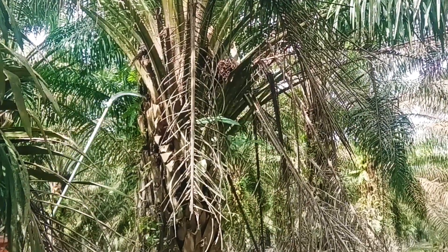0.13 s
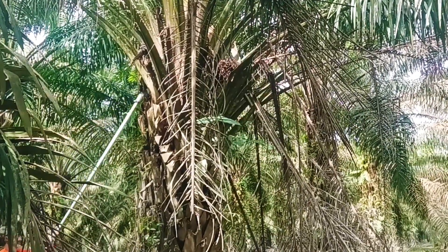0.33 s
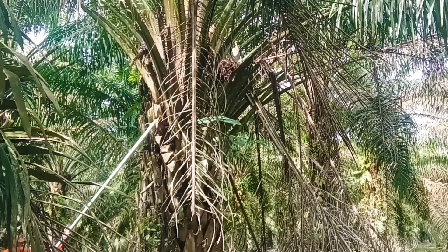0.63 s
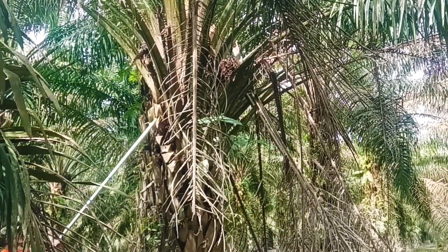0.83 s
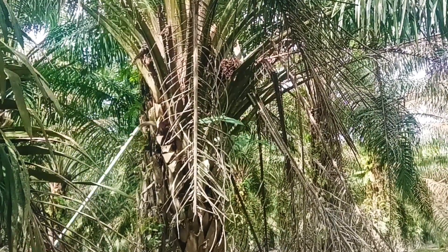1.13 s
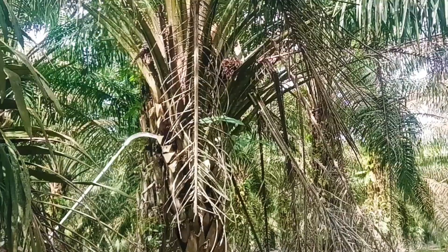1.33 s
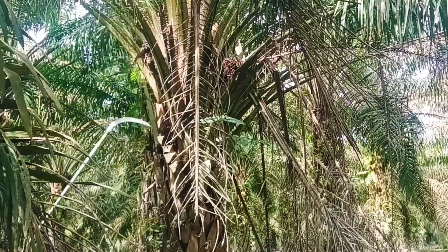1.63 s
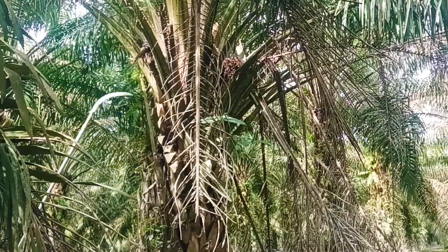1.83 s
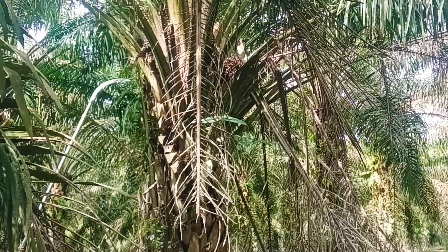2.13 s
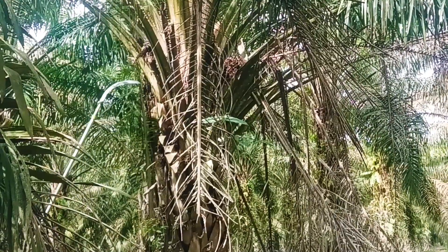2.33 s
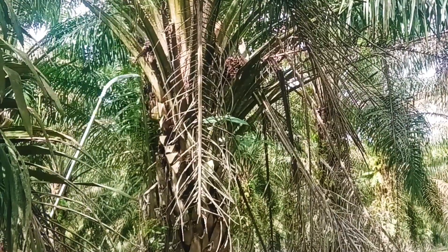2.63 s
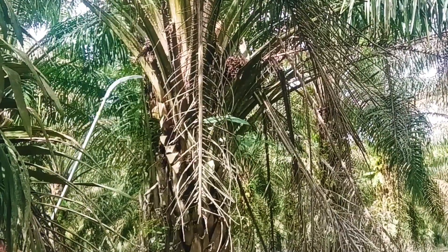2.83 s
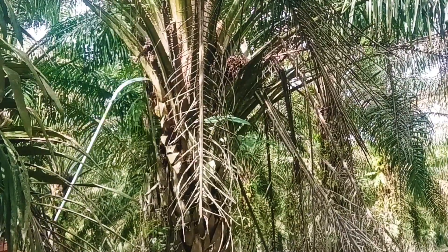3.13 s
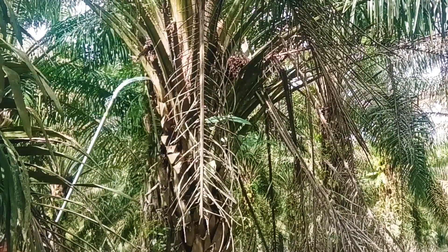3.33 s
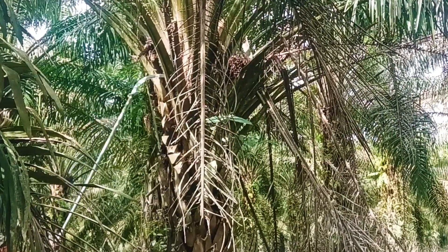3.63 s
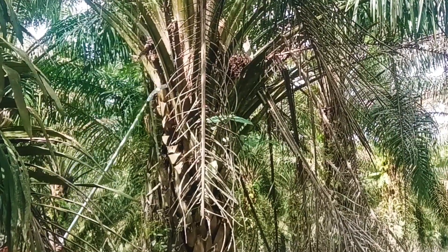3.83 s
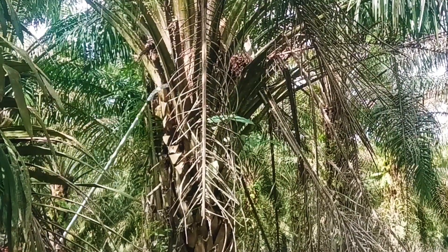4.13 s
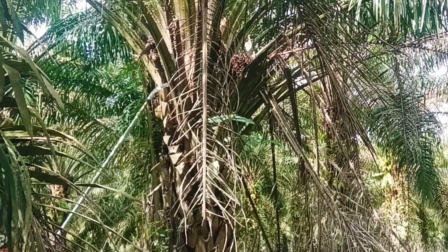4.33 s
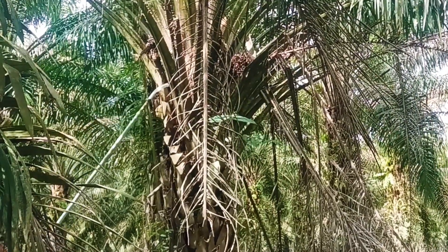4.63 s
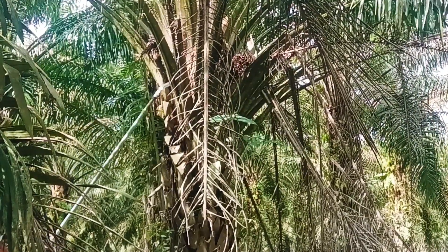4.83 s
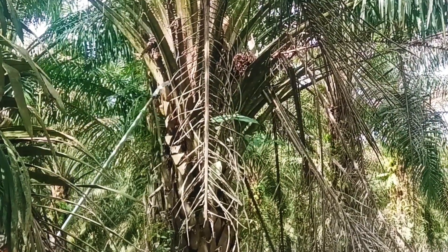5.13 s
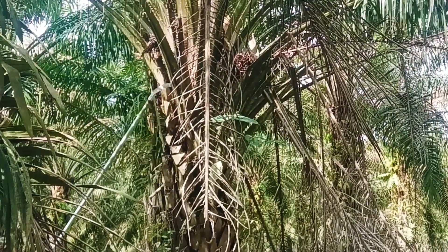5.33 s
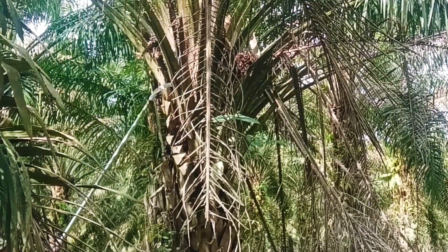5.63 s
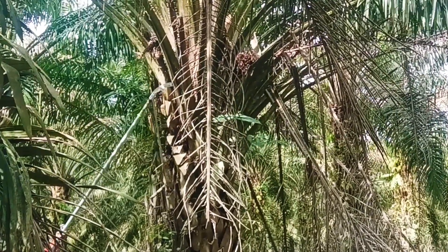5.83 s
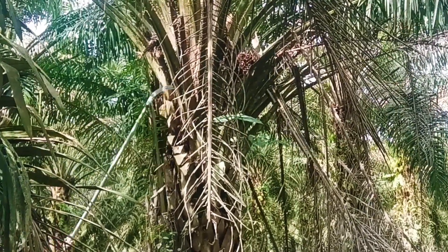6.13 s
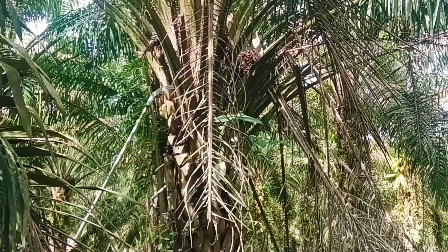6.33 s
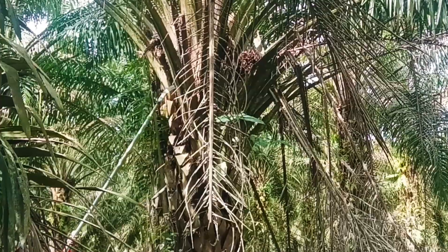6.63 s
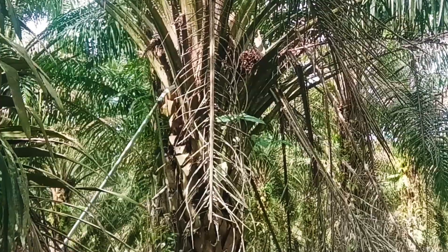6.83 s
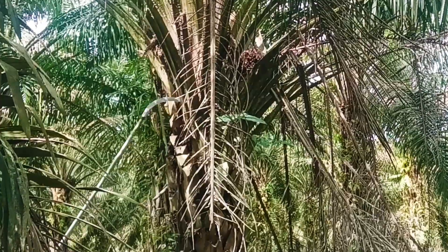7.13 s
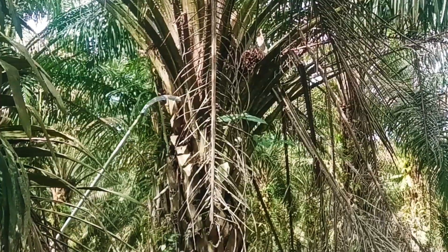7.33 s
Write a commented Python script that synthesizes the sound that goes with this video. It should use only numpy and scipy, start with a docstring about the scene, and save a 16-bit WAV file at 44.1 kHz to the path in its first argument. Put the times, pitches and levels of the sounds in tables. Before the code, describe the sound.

A pole sickle knocks against palm stalks and tears through them with cracks and leafy rustling, over a steady high insect buzz.

```python
"""Insects buzz high and steady in a grove while, a few metres off, a sickle on a pole cuts oil palm fronds.
The blade knocks against the stalks, then is pulled through them: fibres tear and snap, the steel
judders and squeaks, the stalk groans, cracks and thumps. Leaflets rustle as a frond slides down.
Heard on a close pair of microphones, with a faint scatter from the palms and a distant rumble."""
import sys
import numpy as np
from scipy import signal
from scipy.fft import rfft, irfft, next_fast_len
from scipy.io import wavfile
from scipy.ndimage import uniform_filter1d

SR = 44100
rng = np.random.default_rng(int(sys.argv[2]) if len(sys.argv) > 2 else 0)


def unload_wav(signal):
    """Save mono or channel-first audio to the path in sys.argv[1] as 16-bit WAV at rate SR, clipped to [-1, 1]."""
    wavfile.write(
        sys.argv[1],
        SR,
        np.round(np.clip(np.atleast_2d(signal).T, -1, 1) * 32767).astype(np.int16),
    )


N = 329427
T = np.arange(N) / SR
FFT_SIZE = next_fast_len(N + SR)
HZ = np.fft.rfftfreq(FFT_SIZE, 1 / SR)

# pulls of the blade through a stalk:
# (start [s], build-up [s], hold [s], stalk groan [dB], juicy core tearing [dB], dry skin rasp [dB])
PULLS = [(0.24, .025, 0.037, -51, -64, -54), (0.555, 0.0081, 0.008, -39.5, -40.5, -51),
         (0.603, .02, 0.032, -50, -56, -58), (0.692, 0.0031, 0.0091, -40, -50, -42),
         (0.728, .015, 0.028, -52, -52, -61), (1.156, 0.046, 0.069, -32.5, -34, -34),
         (1.355, 0.015, 0.0097, -40, -40.5, -39.5), (1.468, 0.024, 0.041, -40, -45, -38.5),
         (3.911, .035, 0.019, -49, -42, -45), (4.6, 0.01, .03, -39.5, -37.5, -43.5),
         (4.698, 0.012, 0.014, -47, -38, -52), (4.756, .006, 0.02, -43.5, -41.5, -53),
         (4.784, .025, .02, -72, -71, -50), (5.358, 0.022, 0.046, -52, -54.5, -62),
         (5.42, 0.039, 0.019, -49.5, -42, -52), (6.057, .018, 0.018, -46, -39.5, -42),
         (6.211, .015, 0.037, -49.5, -56, -60), (6.274, 0.0029, 0.034, -48.5, -42.5, -44),
         (6.611, 0.019, 0.018, -44, -51.5, -55), (6.667, 0.013, 0.022, -48, -52.5, -56),
         (6.771, 0.024, .015, -50, -48, -57), (7.155, 0.031, 0.11, -31.5, -29.5, -34)]
# spectrum of the stalk's dry skin breaking: (frequency [Hz], level [dB])
SKIN_SPECTRUM = [(400, -32), (900, -10), (1600, -4), (2800, 4.5), (4000, -1.5), (5500, -5), (8000, -4.5),
                 (11000, -14.5), (13000, -20), (15500, -37)]
# how alike the two microphones hear the palm: (frequency [Hz], correlation [-1..1])
PALM_LIKENESS = [(100, 1), (600, 0.94), (1000, 0.72), (1600, 0.91), (2500, 0.57), (4000, 0.11),
                 (8000, 0.27), (15000, 0.079)]


def amp(db):
    """Decibels to amplitude."""
    return 10 ** (np.asarray(db) / 20)


def unit(x):
    """Scales to an RMS of one."""
    return x / np.sqrt(np.mean(x ** 2) + 1e-20)


def curve_at(points, hz):
    """Reads a curve along a logarithmic frequency axis."""
    f, value = np.transpose(points)
    return np.interp(np.log(hz + 1), np.log(f + 1), value)


def dying(t, t60):
    """A decay that loses 60 dB in t60 seconds."""
    return np.exp(-np.log(1000) * t / np.maximum(t60, 1e-3))


def add(mix, start_s, sound):
    """Mixes a sound in at its start time."""
    part = mix[..., max(round(start_s * SR), 0):][..., :sound.shape[-1]]
    part += sound[..., :part.shape[-1]]


def colour(x, spectrum, size=4096):
    """A causal filter of unit energy with the given spectral shape."""
    gain_db = np.maximum(curve_at(spectrum, abs(np.fft.fftfreq(size, 1 / SR))), -100)
    minimum_phase = np.exp(np.conj(signal.hilbert(np.log(amp(gain_db)))))
    taps = np.fft.ifft(minimum_phase).real[:size // 2]
    return signal.oaconvolve(x, taps[None] / np.linalg.norm(taps), axes=1)[:, :N]


def mic_pair(x, likeness):
    """Makes two unrelated channels as alike as two close microphones hear them."""
    a, b = rfft(x, FFT_SIZE)
    same = np.clip(curve_at(likeness, HZ), -1, 1)
    common, apart = np.sqrt((1 + same) / 2) * a, np.sqrt((1 - same) / 2) * b
    return irfft([common + apart, common - apart], FFT_SIZE)[:, :x.shape[1]]


def crackle(per_s, spread_db, grain_s, bed):
    """Tiny bursts of unequal size at random moments, over a bed of countless weaker ones."""
    sizes = amp(spread_db * np.minimum(rng.exponential(1, N), np.e))
    bursts = sizes * (rng.random(N) < per_s / SR)
    power = signal.lfilter([1], [1, -np.exp(-1 / (grain_s * SR))], bursts ** 2)
    return unit(np.sqrt(power / power.mean() + bed) * rng.standard_normal((2, N)))


def air():
    """Distant rumble and the soft hiss of the plantation."""
    # the ambience: (frequency [Hz], level [dB])
    spectrum = [(20, -32), (40, -43), (48, -8), (57, 6), (72, -0.5), (110, 2.5), (200, -3.5), (400, -8.5),
                (800, -12.5), (1400, -17.5), (2100, -18), (3200, -20.5), (5000, -25.5), (8000, -41),
                (12000, -38), (14400, -19), (15500, -31)]
    # its likeness at the two microphones: (frequency [Hz], correlation [-1..1])
    likeness = [(60, 0.81), (130, 0.73), (290, 0.5), (640, 0.3), (1410, -0.33), (3100, 0.25), (6820, -0.04),
                (15000, 0.087)]
    return amp(-54.5) * mic_pair(colour(rng.standard_normal((2, N)), spectrum), likeness)


def insects():
    """Many cicadas merge into one band of buzz that wavers slightly; the nearest adds a thin pitch."""
    # the band of the chorus: (frequency [Hz], level [dB])
    chorus_band = [(5600, -55.5), (6200, -16.5), (6700, -4.5), (7050, 0.5), (7200, 6), (7450, -0.5),
                   (7750, -5), (8100, -23), (9000, -28), (10000, -53)]
    nearest_band = [(7000, -50), (7160, -12), (7195, 0), (7230, -12), (7400, -50)]
    # the chorus eases off once, then holds: (time [s], level [dB])
    loudness = [(0, -42.5), (2, -43.5), (2.7, -46.2), (7.47, -46)]
    drift = uniform_filter1d(rng.standard_normal(N), size=4000)
    waver_db = 0.22 * unit(uniform_filter1d(drift, size=4000))
    chorus = colour(rng.standard_normal((2, N)), chorus_band)
    nearest = colour(rng.standard_normal((2, N)), nearest_band)
    return amp(np.interp(T, *np.transpose(loudness)) + waver_db) * (chorus + amp(-20.0) * nearest)


def leaf_motion():
    """How hard the leaflets move: a faint stir, sweeps that swell and settle, and the sliding frond."""
    # the cut frond slides down through its neighbours: (time [s], level [dB])
    slide = [(1.45, -49), (1.58, -43), (1.66, -42), (1.75, -45.5), (1.98, -42), (2.28, -47), (2.5, -59.5),
             (3.1, -66.5)]
    # the pole or a loose frond sweeps the leaflets: (peak time [s], level [dB], swell [s], t60 [s])
    sweeps = [(0.005, -43, 0.07, 0.21), (0.15, -45.5, 0.36, 0.72), (0.32, -53, 0.097, 0.84),
              (0.55, -50, 0.16, 0.98), (0.73, -47, 0.061, 0.73), (0.83, -49, 0.18, 0.42),
              (1.28, -36, 0.093, 0.71), (3.098, -56, 0.026, 1), (4.2, -62.5, 0.61, 0.83),
              (4.95, -61, 0.9, 12), (5.7, -68, 0.48, 11), (6.22, -59, 0.2, 0.55), (7.46, -38.5, 0.15, 1)]
    stir_db, swell_db = -70.5, 21.5
    sliding = amp(np.interp(T, *np.transpose(slide), left=-np.inf, right=-np.inf))
    power = amp(stir_db) ** 2 + sliding ** 2
    for peak_s, db, swell_s, t60 in sweeps:
        swelling = amp(-swell_db * np.maximum(peak_s - T, 0) / swell_s)
        settling = dying(np.maximum(T - peak_s, 0), t60)
        power += (amp(db) * swelling * settling) ** 2
    return np.sqrt(power)


def leaves():
    """Stiff leaflets brush against one another; now and then one flicks past with a tick."""
    # brushing leaflets: (frequency [Hz], level [dB])
    spectrum = [(100, -18), (250, -0.5), (600, -4.5), (1500, 0), (2900, 3), (4500, -1), (6000, -2.5),
                (8000, 0), (10000, -9), (11500, -7), (13000, -18), (15500, -16)]
    brushing = crackle(per_s=900, spread_db=3, grain_s=.0008, bed=1)
    flicks = amp(-7) * crackle(per_s=50, spread_db=3.5, grain_s=.0012, bed=0)
    return amp(3.5) * colour(leaf_motion() * (brushing + flicks), spectrum)


def squeaks():
    """Stick and slip of the blade: a short hoarse whistle whose pitch and strength both stumble."""
    # slips on wet fibre: (time [s], length [s], start pitch [Hz], end pitch [Hz], level [dB])
    slips = [(.795, 0.033, 2340, 2360, -38.5), (0.832, 0.019, 2046, 1794, -37),
             (0.837, 0.028, 1544, 1390, -44.5), (4.637, 0.016, 1176, 1026, -31),
             (4.722, 0.027, 840, 813, -36), (4.777, 0.023, 558, 486, -37.5), (6.61, 0.025, 2670, 2440, -52),
             (7.439, 0.039, 1614, 1570, -42)]
    out = np.zeros((2, N))
    for start, length, start_hz, end_hz, db in slips:
        n = int(length * SR)
        jitter, shimmer = unit(uniform_filter1d(rng.standard_normal((2, 2, n)), size=40))
        hz = np.linspace(start_hz, end_hz, n) * (1 + .033 * jitter)
        whistle = (1 + 0.13 * shimmer) * np.sin(2 * np.pi * np.cumsum(hz, 1) / SR)
        add(out, start, amp(db) * signal.windows.tukey(n, .7) * unit(whistle))
    return out


def blade_judder():
    """A gritty judder of the edge drives the modes of the steel, which the stalk damps quickly."""
    # modes of the blade, gripped by the stalk: (frequency [Hz], level [dB], t60 [s])
    steel_modes = [(2440, -5, 0.041), (2900, -7, 0.053), (3060, -1.5, 0.081), (3822, -16, 0.054),
                   (4220, -4, 0.053), (5050, 0.5, 0.065), (5760, 1, 0.05), (7960, 0.5, 0.011),
                   (10230, -8, .007), (10860, -4, 0.0091), (11340, -9, 0.0073), (12700, -21, .015)]
    # the edge catches: (time [s], level [dB], centre of the shaken modes [Hz], judder t60 [s])
    catches = [(.086, -41.5, 11500, 0.06), (.70, -46.5, 11300, 0.21), (1.235, -41, 10500, 0.29),
               (3.928, -49, 9550, .12), (4.62, -48, 10800, 0.087), (4.65, -46, 2500, 0.14),
               (4.715, -43, 2200, 0.16), (4.816, -46.5, 3520, 0.097), (5.3, -57, 6000, .09),
               (5.311, -49, 2500, 0.055), (6.07, -38, 3350, 0.16), (6.096, -47, 4400, .09),
               (6.277, -45.5, 11000, 0.19), (6.685, -49.5, 10900, 0.13), (7.21, -39.5, 11000, 0.4)]
    t, out = np.arange(SR // 5) / SR, np.zeros((2, N))
    hz, mode_db, t60 = np.transpose(steel_modes)[:, :, None]
    modes = dying(t, t60) * np.sin(2 * np.pi * hz * t)
    modes *= amp(mode_db) / np.linalg.norm(modes, axis=1, keepdims=True)
    for start, db, centre_hz, judder_t60 in catches:
        shaken = np.exp(-(np.log2(hz / centre_hz) / 0.64) ** 2)
        ring = (shaken * modes).sum(axis=0)
        judder = dying(t, judder_t60) * rng.standard_normal((2, len(t)))
        add(out, start, amp(db) * signal.fftconvolve(judder, ring[None], axes=1))
    return amp(3.5) * out


def snaps():
    """Single dry fibres break with a bright tick."""
    # breaking fibres: (time [s], level [dB], t60 [s])
    fibres = [(0.0837, -32, 0.027), (0.122, -24, 0.02), (0.15, -30, 0.025), (0.175, -37, 0.036),
              (0.357, -39, 0.035), (0.6874, -23.5, 0.038), (2.5626, -34.5, 0.04), (4.4252, -39, 0.03),
              (4.612, -41, 0.033), (6.0693, -33, 0.034), (6.2782, -30, 0.019), (6.301, -30, 0.026),
              (6.647, -23.5, 0.047), (6.6857, -36, 0.023), (7.1463, -36, 0.038), (7.3734, -20.5, 0.1)]
    t, out = np.arange(SR // 8) / SR, np.zeros((2, N))
    for start, db, t60 in fibres:
        add(out, start, amp(db) * dying(t, t60) * rng.standard_normal((2, len(t))))
    return amp(-8.5) * colour(out, SKIN_SPECTRUM)


def knocks():
    """Steel on a hard stalk: a cluster of short woody modes, a little different at each spot, and a clack."""
    # blade or pole hits a stalk: (time [s], level [dB], clack t60 [s], ring offset [dB])
    strikes = [(0.12, -54, 0.09, 1), (0.564, -29.5, 0.057, 1), (0.69, -19, 0.077, -8),
               (0.705, -39, 0.077, -13), (1.711, -33.5, 0.049, 7), (2.562, -49, 0.06, -3),
               (3.35, -48, 0.06, -3), (3.09, -38.5, 0.063, -1), (3.544, -46, 0.075, -13),
               (3.787, -23.5, 0.11, 6.5), (4.087, -49, 0.1, -6), (4.642, -31, 0.058, 7),
               (5.439, -41.5, 0.06, 2), (6.277, -35, 0.044, 0), (6.648, -41, 0.04, -8),
               (7.373, -21.5, 0.031, -7)]
    # modes of a struck stalk: (frequency [Hz], level [dB], t60 [s])
    stalk_modes = [(225, 1, .06), (390, 0, .05), (570, 0, .06), (880, 0, .06), (1090, -1, .06),
                   (1357, -3, .05), (1540, -3, .055), (1880, -5, .055), (2240, -5, .06), (2430, -5, .12),
                   (2920, -12, .1), (3540, -14, .07)]
    # the contact noise: (frequency [Hz], level [dB])
    clack_spectrum = [(100, -23.5), (220, -1.5), (450, -4), (1000, -5.5), (1700, -1), (2400, -5.5),
                      (3200, -11.5), (4200, -22), (6000, -21), (9000, -35), (15000, -47)]
    t, ring, clack = np.arange(SR // 3) / SR, np.zeros(N), np.zeros((2, N))
    bite = 1 - np.exp(-t / 0.00055)  # the edge sinks in over a millisecond
    for start, db, clack_t60, ring_db in strikes:
        phases = rng.uniform(0, 2 * np.pi, len(stalk_modes))
        detune = rng.uniform(.985, 1.015)
        modes = sum(amp(level) * dying(t, t60) * np.sin(2 * np.pi * hz * detune * t + phase)
                    for (hz, level, t60), phase in zip(stalk_modes, phases))
        add(ring, start, amp(db + ring_db) * bite * modes / len(stalk_modes))
        add(clack, start, amp(db) * bite * dying(t, clack_t60) * rng.standard_normal((2, len(t))))
    return amp(4.5) * ring, amp(-5.5) * colour(clack, clack_spectrum)


def cracks():
    """Each break swings the heavy stalk for a few uneven cycles and throws a spray of splinters."""
    # breaks in the stalk: (time [s], level [dB], pitch [Hz], splinter offset [dB])
    breaks = [(0.274, -31.5, 251, -29), (0.603, -35, 293, -12), (0.734, -32.5, 246, -3),
              (1.197, -24, 628, -16), (1.242, -24, 620, -4), (1.256, -21.5, 364, -16),
              (1.275, -25, 328, 4.5), (1.364, -22.5, 316, -7.5), (1.411, -31.5, 333, 0.5),
              (1.495, -24.5, 337, -11), (1.528, -28, 282, -20), (1.64, -34, 322, 3), (3.826, -31, 274, -7),
              (4.622, -27.5, 527, -8), (4.643, -22.5, 570, -3.5), (4.728, -19.5, 508, -11.5),
              (4.742, -30, 727, -0.5), (4.765, -22.5, 736, -16), (4.886, -29, 236, -17.5),
              (5.304, -27.5, 225, -12), (6.098, -22, 235, -14.5), (6.707, -32, 220, -27),
              (7.214, -17.5, 860, -5), (7.24, -24, 860, -2.5), (7.253, -17, 530, -10),
              (7.271, -18, 875, -15), (7.294, -18.5, 554, -8)]
    # the splintering: (frequency [Hz], level [dB])
    splinter_spectrum = [(200, -4), (600, 5.5), (1500, 8), (2800, 4.5), (4500, -7), (8000, -32),
                         (11000, -15), (15000, -29)]
    t, thump, spray = np.arange(SR // 10) / SR, np.zeros(N), np.zeros((2, N))
    for start, db, hz, splinter_db in breaks:
        rise_s = 0.0033 * (300 / hz) ** 0.23  # higher breaks peak sooner
        swing = (t / rise_s * np.exp(1 - t / rise_s)) ** 0.9
        uneven = .12 * unit(uniform_filter1d(rng.standard_normal(len(t)), size=130))
        angle = 2 * np.pi * hz * np.cumsum(1 + uneven) / SR
        # the flat stalk is stiffer one way, which gives a second, higher mode
        stiff_mode = amp(-9.5) * np.sin(1.444 * angle + rng.uniform(0, 2 * np.pi))
        add(thump, start, amp(db) * swing * (np.sin(angle) + stiff_mode))
        add(spray, start, amp(db + splinter_db) * swing * rng.standard_normal((2, len(t))))
    return amp(-4.0) * thump, amp(-5) * colour(spray, splinter_spectrum)


def pull_force(levels_db, fade_db_per_s, build_share=1):
    """The force of every pull builds up, holds while the blade travels, and dies away."""
    slack_db = 21  # a pull starts this far below its full force
    t, out = np.arange(SR // 2) / SR, np.zeros(N)
    for (start, build, hold, *_), db in zip(PULLS, levels_db):
        building = slack_db * np.maximum(1 - t / (build * build_share), 0)
        fading = fade_db_per_s * np.maximum(t - build - hold, 0)
        add(out, start, amp(db - building - fading))
    return out


def pulls():
    """The blade bends the stalk, tears thick wet fibres in its core and fine dry ones in its skin."""
    # the bending stalk: (frequency before the frond's factor [Hz], level [dB])
    groan_spectrum = [(90, -31.5), (140, -13.5), (190, -2.5), (240, 1), (290, 1), (380, -13.5), (600, -24),
                      (1500, -31.5)]
    # the two fronds, the thinner one first: (start [s], end [s], groan pitch factor [ratio])
    fronds = [(0, 3, 1.33), (3, 7.5, 1.0)]
    # the juicy core tearing: (frequency [Hz], level [dB])
    core_spectrum = [(200, -33), (400, -5), (550, 4), (800, -1), (1100, -2.5), (1500, -1.5), (2400, -10),
                     (4000, -34.5)]
    groan_db, core_db, skin_db = np.transpose(PULLS)[3:]
    groan = pull_force(groan_db, fade_db_per_s=352, build_share=0.76)  # it bends before it tears
    groan = groan * crackle(per_s=1500, spread_db=2, grain_s=.002, bed=.5)
    core = pull_force(core_db, fade_db_per_s=374) * crackle(per_s=700, spread_db=3.3, grain_s=.0007, bed=.3)
    skin = pull_force(skin_db, fade_db_per_s=217) * crackle(per_s=1100, spread_db=3, grain_s=.0005, bed=.6)
    bending = np.zeros((2, N))
    for start, end, pitch in fronds:
        spectrum = [(hz * pitch, db) for hz, db in groan_spectrum]
        bending += colour(groan * (T >= start) * (T < end), spectrum)
    tearing = amp(-1.5) * colour(core, core_spectrum) + amp(2.0) * colour(skin, SKIN_SPECTRUM)
    return amp(-3.0) * bending + tearing


def grove(x, near_db, near_t60, far_db, far_t60):
    """Nearby fronds scatter the sound at once; trunks further off return a faint tail."""
    t = np.arange(SR // 2) / SR
    near, far = dying(t, near_t60) * (t > .003), dying(t, far_t60) * (t > .02)
    shape = amp(near_db) * near / np.linalg.norm(near) + amp(far_db) * far / np.linalg.norm(far)
    echoes = mic_pair(shape * rng.standard_normal((2, len(t))), PALM_LIKENESS)
    return x + signal.fftconvolve(x, echoes, axes=1)[:, :N]


def scene():
    """The palm stands a few metres from the microphones, with insects and air all around."""
    thump, splinters = cracks()
    ring, clack = knocks()
    scattered = pulls() + leaves() + splinters + clack + snaps() + blade_judder() + squeaks()
    palm = mic_pair(scattered, PALM_LIKENESS) + thump + ring
    left, right = grove(palm, near_db=-9.0, near_t60=0.096, far_db=-14.0, far_t60=0.51)
    left = np.concatenate([np.zeros(6), left[:-6]])  # the sound reaches the right microphone first
    return np.array([left, right]) + insects() + air()


def record(dry):
    """The two microphone ports colour the treble differently; a low-pass cuts the very top."""
    # imbalance of the ports: (frequency [Hz], left minus right [dB])
    imbalance = [(100, 0.3), (700, 0), (2400, -0.8), (4400, -3), (5700, -4.5), (6600, -9.5), (7300, -16.5),
                 (8100, -6.5), (9000, -20), (10000, 23), (11800, 7), (12500, 14), (15000, 18)]
    lean = amp(curve_at(imbalance, HZ))
    ports = np.array([lean, np.ones_like(lean)]) * np.sqrt(2 / (1 + lean ** 2))
    heard = irfft(rfft(dry, FFT_SIZE) * ports, FFT_SIZE)[:, :N]
    low_pass = signal.firwin(511, cutoff=15400, window=("kaiser", 9), fs=SR)
    return signal.oaconvolve(heard, low_pass[None], "same")


dry = scene()
out = record(dry)
unload_wav(out)
```